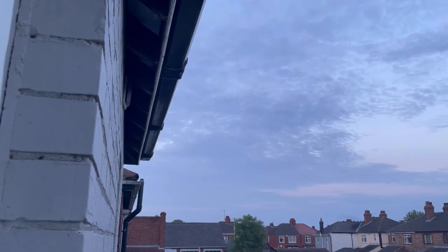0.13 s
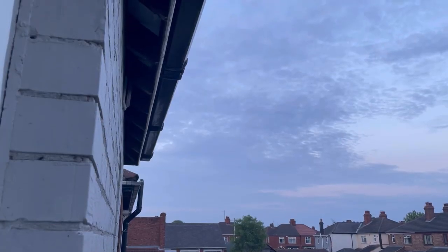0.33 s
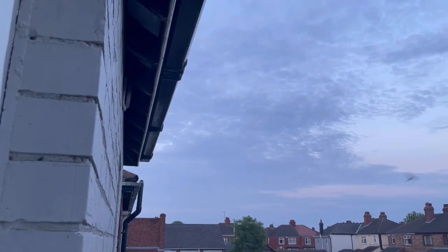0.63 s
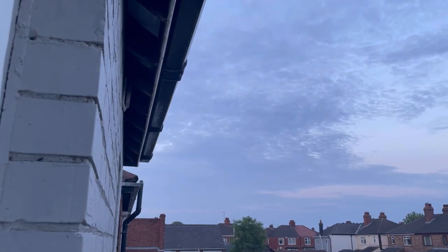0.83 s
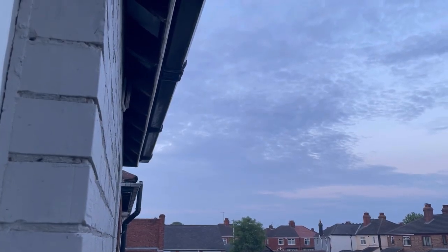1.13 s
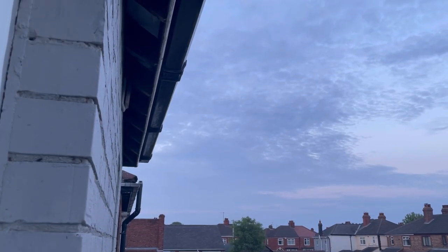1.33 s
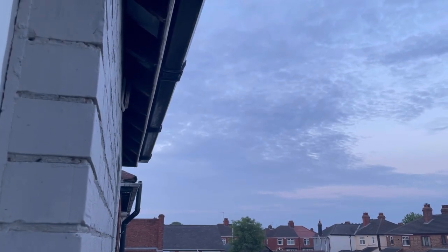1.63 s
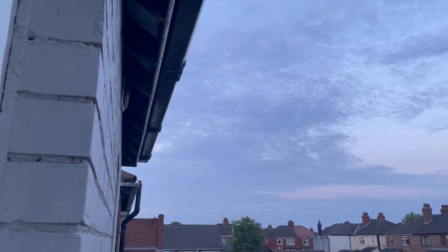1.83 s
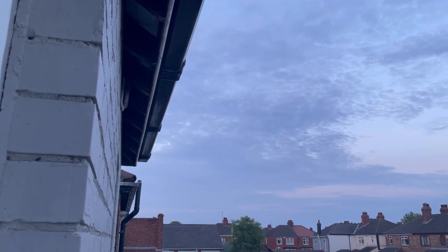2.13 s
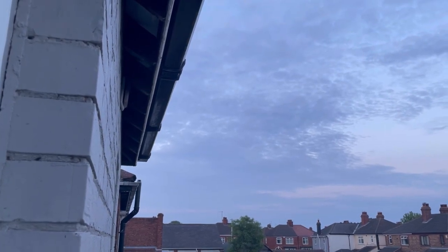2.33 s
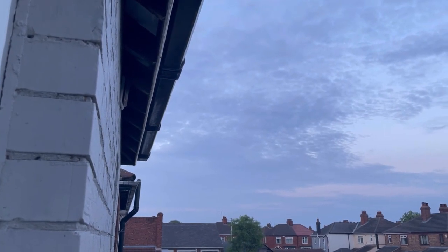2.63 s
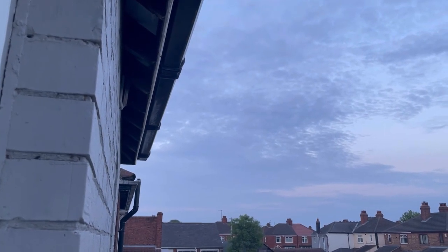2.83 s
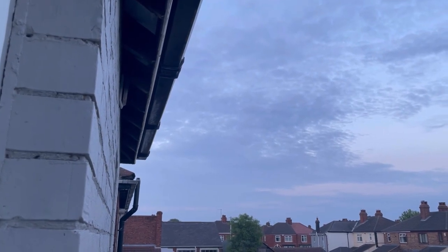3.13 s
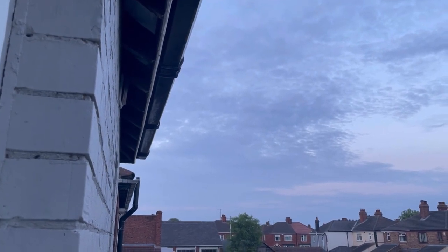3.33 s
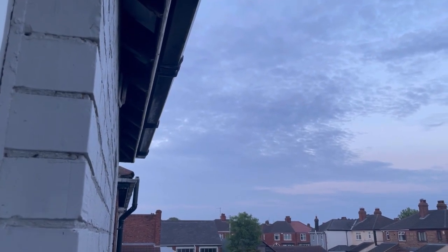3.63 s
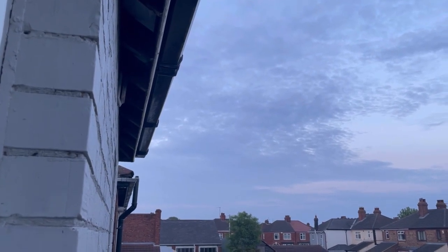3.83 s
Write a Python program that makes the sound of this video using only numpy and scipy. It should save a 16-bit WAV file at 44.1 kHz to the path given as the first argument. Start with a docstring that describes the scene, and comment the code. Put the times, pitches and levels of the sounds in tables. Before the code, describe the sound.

A swift screams twice in shrill trills as it shoots past, over faint traffic rumble.

```python
"""A swift screams twice as it shoots past the eaves of a house. Each scream is a fast shrill trill
that breaks into separate chips, falling in pitch; the wall and the far houses throw it back, and air
swishes over the wings. Behind it: traffic rumble with faint engine drones, light wind on the
microphone, the fading tail of an earlier swift scream, then faint chirps and distant songbirds."""
import sys
import numpy as np
from scipy import signal
from scipy.fft import rfft, irfft
from scipy.io import wavfile

SR = 44100
rng = np.random.default_rng(int(sys.argv[2]) if len(sys.argv) > 2 else 0)


def dump(signal):
    """Clip the signal to [-1, 1] and save it as 16-bit WAV at the path in sys.argv[1]."""
    limited = np.clip(np.atleast_2d(signal).T, -1, 1)
    pcm = np.round(limited * 32767).astype(np.int16)
    wavfile.write(sys.argv[1], SR, pcm)


N = 176400
T = np.arange(N) / SR
HZ = np.fft.rfftfreq(N, 1 / SR)
SIDES = np.array([[.5], [-.5]])  # splits a left-minus-right value between the ears


def amp(db):
    """Decibels to gain."""
    return 10 ** (np.asarray(db) / 20)


def unit_rms(x):
    """Scales to rms 1."""
    return x / np.sqrt(np.mean(x ** 2) + 1e-20)


def per_bin(points):
    """Interpolates (f/Hz, value) rows onto the FFT bins, in log frequency."""
    f, value = np.transpose(points)
    return np.interp(np.log(HZ + 1), np.log(f + 1), value)


def add(mix, start_s, sound):
    """Mixes a stereo sound in at start_s."""
    part = mix[:, max(round(start_s * SR), 0):][:, :sound.shape[1]]
    part += sound[:, :part.shape[1]]


def wander(size, hz):
    """Random signal of rms about 1, low-passed at hz."""
    return unit_rms(irfft(rfft(rng.standard_normal(N)) / (1 + (HZ / hz) ** 4), N))[:size]


def noise(spectrum, coherence):
    """Stereo noise of rms 1 with a given spectral shape and left-right coherence."""
    left, other = rfft(rng.standard_normal((2, N)))
    right = coherence * left + np.sqrt(1 - coherence ** 2) * other
    return unit_rms(irfft(np.array([left, right]) * amp(per_bin(spectrum)), N))


def gate(t, edge_s):
    """Sine-squared attack and release."""
    return np.sin(np.pi / 2 * np.clip(np.minimum(t, t[-1] - t) / edge_s, 0, 1)) ** 2


def diffuse(x, envelope):
    """Dense reflections: convolves x with an enveloped noise tail of about unit energy."""
    tail = rng.standard_normal((2, len(envelope))) * envelope / np.linalg.norm(envelope)
    return signal.fftconvolve(x, tail, axes=1)[:, :N]


def traffic():
    """Continuous rumble of far traffic."""
    # spectrum before the low cut: f/Hz, relative density/dB
    spectrum = [(15, -33), (25, -6.5), (59, -3.5), (120, -4.5), (145, -10.5), (229, -13), (373, -18.5),
                (476, -18.5), (560, -22), (988, -21), (1330, -30.5), (2410, -43.5), (3160, -51.5),
                (6920, -56), (8590, -63.5), (10100, -55), (16000, -76)]
    # likeness of the ears: f/Hz, coherence
    coherence = [(30, .85), (120, 0.91), (250, 0.742), (500, 0.42), (900, -0.31), (2000, 0.082),
                 (8000, 0.64)]
    # stereo balance: f/Hz, left-right/dB
    balance = [(30, -1), (70, 1), (150, 2.5), (300, 2), (550, 1.3), (8000, -1)]
    # loudness contour: t/s, level before trim/dB
    contour = [(0.0, -66), (0.37, -62), (3.54, -61.5), (3.7, -60.5), (3.84, -62), (4.0, -58.5)]
    low_cut_hz, trim_db = 90, 2.5
    bins = rfft(noise(spectrum, per_bin(coherence))) * amp(SIDES * per_bin(balance))
    rumble = unit_rms(irfft(bins * HZ ** 4 / (HZ ** 4 + low_cut_hz ** 4), N))
    level_db = np.interp(T, *np.transpose(contour)) + trim_db + .6 * wander(N, hz=14)
    return rumble * amp(level_db)


def engine_drones():
    """Wavering notes of far engines, a little to the left."""
    # engine swells: peak t/s, half length/s, f/Hz, level/dB
    swells = [(.3, 4, 120.8, -68), (3.497, 1.2, 232, -70), (3.701, 0.096, 367.8, -64.5)]
    width_hz, pan_db = 7, 3.5
    out = np.zeros(N)
    for peak_s, half_s, hz, db in swells:
        blur = wander(N, width_hz) + 1j * wander(N, width_hz)
        tone = (blur * np.exp(2j * np.pi * hz * T)).real
        out += amp(db) * np.exp(-((T - peak_s) / half_s) ** 2) * tone
    return out * amp(SIDES * pan_db)


def wind():
    """A light breeze with short puffs that thud on the microphone."""
    # puffs: peak t/s, half length/s, level/dB
    puffs = [(0.828, 0.044, -49), (1.595, 0.026, -46.5), (2.36, .015, -47.5), (2.46, 0.047, -49),
             (2.647, 0.019, -48.5), (2.751, 0.094, -59), (3.18, 0.064, -55), (3.699, .02, -43.5),
             (3.858, 0.038, -47.5), (3.978, 0.045, -50)]
    # buffeting spectrum: f/Hz, relative density/dB
    spectrum = [(15, -17.5), (35, -9), (60, 1), (110, -10), (200, -20.5), (500, -40), (2000, -70.5),
                (8000, -94.5)]
    breeze_db, build_s = -62.5, .6
    breeze = amp(breeze_db + 1.8 * wander(N, hz=5.3)) * np.clip(T / build_s, .15, 1)
    thuds = sum(amp(db) * np.exp(-((T - peak_s) / half_s) ** 2) for peak_s, half_s, db in puffs)
    return noise(spectrum, coherence=.86) * np.hypot(breeze, thuds)


def far_birds():
    """Blurred glides: the fading tail of an earlier swift scream, faint chirps, distant songbirds."""
    # far bird notes: t/s, length/s, level/dB, start f/Hz, end f/Hz
    notes = [(-.03, 0.11, -62.5, 5000, 5230), (0, 0.032, -63.5, 6940, 5900), (.027, .014, -60, 4100, 3600),
             (.092, 0.015, -55.5, 4000, 3600), (1.297, .035, -80.5, 2900, 2790),
             (1.43, 0.2, -81, 2638, 2313), (1.66, .12, -77, 2386, 2440), (1.89, 0.12, -80.5, 2137, 1930),
             (2.27, .13, -78.5, 1950, 2057)]
    width_hz = 120
    out = np.zeros((2, N))
    blur = np.array([wander(N, width_hz) + 1j * wander(N, width_hz) for ear in out])
    for start_s, length_s, db, from_hz, to_hz in notes:
        progress = np.clip((T - start_s) / length_s, 0, 1)
        turns = np.cumsum(from_hz + (to_hz - from_hz) * progress) / SR
        out += amp(db) * np.sin(np.pi * progress) * (blur * np.exp(2j * np.pi * turns)).real
    return out


def syrinx(hz, gain, over_db, under_db, pan_db):
    """The swift's voice: a shrill tone with overtones, unsteady half-pitch partials and slight hiss."""
    size, slip_rad = len(hz), .8
    phase = 2 * np.pi * np.cumsum(hz) / SR
    tone = np.sin(phase) + amp(over_db) * (np.sin(2 * phase) + amp(-17.5) * np.sin(3 * phase))
    half = phase / 2 + slip_rad * wander(size, hz=170)
    # undertone series: 1/2, 3/2 and 5/2 of the pitch
    under = amp(-11.5) * np.sin(half) + np.sin(half + phase) + amp(-13.5) * np.sin(half + 2 * phase)
    hiss = amp(-44) * wander(size, hz=9000)
    voice = np.sqrt(2) * (tone + amp(under_db) * under) + hiss
    return gain * voice * amp(SIDES * pan_db)


def trill(curve):
    """Pitch and loudness swing together, roughly 170-275 times a second."""
    swing_hz, jitter_hz = 265, 40
    dip_db, shimmer_db, offset_turns = 12, 2.2, .12
    times, *columns = np.transpose(curve)
    t = np.arange(times[0], times[-1], 1 / SR)
    hz, db, over_db, under_db, pan_db, rate_hz, depth = (np.interp(t, times, c) for c in columns)
    size = len(t)
    cycle = 2 * np.pi * np.cumsum(rate_hz * (1 + .06 * wander(size, hz=92))) / SR
    pitch_hz = hz + swing_hz * depth * np.cos(cycle) + jitter_hz * wander(size, hz=400)
    swing_db = dip_db / 2 * depth * np.sin(cycle + 2 * np.pi * offset_turns)
    flutter = unit_rms(amp(swing_db + shimmer_db * wander(size, hz=140)))
    gain = amp(db) * flutter * gate(t - t[0], edge_s=.002)
    return times[0], syrinx(pitch_hz, gain, over_db, under_db, pan_db)


def chip(length_s, db, hz, over_db, under_db, pan_db, rasp):
    """One short note of arched pitch; the forced ones rasp."""
    arch_hz, rasp_hz, rasp_db = 110, 400, 1.5
    t = np.arange(0, length_s, 1 / SR)
    pitch_hz = hz + arch_hz * (np.sin(np.pi * t / length_s) - 1)
    pitch_hz += rasp * rasp_hz * wander(len(t), hz=800)
    roughness = unit_rms(amp(rasp * rasp_db * wander(len(t), hz=755)))
    gain = amp(db) * gate(t, edge_s=.0026) * roughness
    return syrinx(pitch_hz, gain, over_db, under_db, pan_db)


def swift():
    """Two screams, each a trill that breaks into chips."""
    # one curve per trill: t/s, f/Hz, source level/dB, overtone/dB, undertone/dB, left-right/dB,
    # trill rate/Hz, trill depth/0-1
    trills = [
        [(.045, 5070, -48, -8, -40.5, 7.5, 171, 0.15), (.059, 5396, -32, -14, -43.5, 6.5, 194, .35),
         (.099, 5506, -32.5, -17, -51, 5.5, 226, .6), (.125, 5597, -30.5, -12.5, -49.5, 2, 253, .8),
         (.167, 5578, -29.5, -14.5, -49.5, -3, 257.6, .85), (.205, 5504, -28.5, -11.5, -50, 3, 234, 0.8),
         (.223, 5540, -32.5, -12, -37.5, 8.5, 275, 1), (.229, 5350, -46, -13, -35.5, 6, 268, .8)],
        [(.461, 4740, -58.5, -5, -29, 18, 185.2, 0), (.478, 5830, -48.5, -21.5, -30, 9, 199, 0.2),
         (.497, 5285, -44, -19.5, -15.5, -2.5, 191.4, 0.06), (.515, 5280, -45, -19, -10, -1.5, 171.5, 0.7),
         (.535, 5450, -38, -17.5, -35, 6, 187.8, 0.27), (.572, 5497, -37.5, -22, -26, -5.5, 231.8, 0.55),
         (.597, 5363, -39, -15.5, -15, -1, 241, 0.2), (.652, 5390, -41, -24.5, -27.5, 3.5, 233.4, 0.9),
         (.671, 5320, -50.5, -16, -12, -9.5, 181, 1)],
    ]
    # closing chips: t/s, length/s, source level/dB, f/Hz, overtone/dB, undertone/dB,
    # left-right/dB, rasp/0-1
    chips = [(0.2392, .0085, -28.5, 5700, -6, -25.5, -7, 1),
             (0.2647, .008, -19.5, 5893, -7.5, -33.5, 0.5, .2),
             (.272, .005, -28.5, 6750, -31, -23, -0.5, 1), (0.292, 0.0066, -22.5, 5916, -9, -33.5, -3, .4),
             (0.3182, 0.011, -28.5, 5376, -12.5, -28, -9.5, .2),
             (0.346, 0.013, -32, 4484, -24.5, -32.5, -4.5, 0.3),
             (.365, 0.012, -39.5, 4213, -30.5, -27.5, 4.5, 0.1),
             (0.6745, 0.011, -40, 5140, -21, -20.5, 9, 0.42),
             (0.688, 0.011, -36.5, 5350, -17.5, -32, 9.5, 0.15),
             (0.7023, 0.0061, -29.5, 5255, -17.5, -21, -8, 0.13),
             (.714, 0.0072, -38, 5294, -19, -24.5, 25, 0), (0.7263, .008, -34, 5120, -17, -37, 14.5, 0),
             (0.7385, 0.011, -31, 5020, -23, -27.5, -6, 0.2),
             (.7524, 0.0086, -37, 4840, -21, -30.5, 23, 0.07),
             (0.7665, .0075, -33.5, 4710, -26, -26.5, -11.5, 0.3),
             (.7792, .008, -38.5, 4586, -25.5, -24, 9, 0.6),
             (0.793, 0.017, -50.5, 4290, -36, -17, -2, 0.22)]
    out = np.zeros((2, N))
    for curve in trills:
        add(out, *trill(curve))
    for start_s, *note in chips:
        add(out, start_s, chip(*note))
    return out


def mic_ports(x):
    """Colour and phase that the two microphone ports give a close sound."""
    # port response: f/Hz, gain/dB
    colour = [(2700, 1), (3300, -3.5), (4500, -4.5), (6500, 1.5), (8000, -5), (9500, -3.5), (11500, 0),
              (12300, -7.5), (13000, -14), (14300, -8.5), (15700, -1.5)]
    # phase lead of the left ear: f/Hz, lead/rad
    lead = [(1000, .3), (4200, .8), (5600, 1.7), (8000, 1), (10600, .3), (11500, 1.5), (12300, 2.5),
            (16000, 1.8)]
    return irfft(rfft(x) * amp(per_bin(colour)) * np.exp(1j * SIDES * per_bin(lead)), N)


def wall_echoes(x):
    """Quick reflections from wall and eaves, different at each ear."""
    count, level_db = 8, -10
    delays_s = np.linspace(.001, .016, count) * rng.uniform(.8, 1.4, (2, count))
    gains = unit_rms(1 / np.sqrt(np.arange(count) + 1)) / np.sqrt(count)
    out = np.zeros((2, N))
    for ear in range(2):
        for delay_s, gain in zip(delays_s[ear], gains):
            out[ear] += gain * np.roll(x[ear], round(delay_s * SR))
    return amp(level_db) * out


def yard_scatter(x):
    """Short bright scatter from the nearby roof and ground."""
    level_db, t60_s, rise_s = -19.5, .2, .004
    t = T[:SR // 2]
    envelope = amp(-60 * t / t60_s) * (1 - np.exp(-t / rise_s))
    return amp(level_db) * diffuse(x, envelope)


def street_reverb(x):
    """A dull diffuse tail with a soft echo from the houses opposite."""
    send_db, t60_s, rise_s, cutoff_hz = -9.5, .62, .0089, 4000
    echo_db, echo_s, spread_s = -12, .21, .0084
    t = T[:SR]
    decay = amp(-60 * t / t60_s) * (1 - np.exp(-t / rise_s))
    houses = amp(echo_db) * np.exp(-((t - echo_s) / spread_s) ** 2)
    wet = amp(send_db) * diffuse(x, decay + houses)
    return irfft(rfft(wet) / (1 + (HZ / cutoff_hz) ** 4), N)


def wings():
    """Air rushing over the wings: faint on the approach, a quick swell at the closest point."""
    # swish spectrum: f/Hz, relative density/dB
    spectrum = [(300, -24), (900, -12), (1300, -9), (1700, -1.5), (2300, -13), (3200, -19), (4300, -7.5),
                (6500, -32), (12000, -47.5)]
    approach_db, approach_s, half_s = -68.5, .2534, .31
    swell_db, closest_s, rise_s, fall_s = -53, .397, .03, .031
    approach = amp(approach_db) * np.exp(-((T - approach_s) / half_s) ** 2)
    swell = amp(swell_db) * np.exp(-abs(T - closest_s) / np.where(T < closest_s, rise_s, fall_s))
    return noise(spectrum, coherence=.45) * np.hypot(approach, swell)


def scene():
    """The swift and its echoes over the town background."""
    screams = mic_ports(swift())
    echoes = wall_echoes(screams) + yard_scatter(screams) + street_reverb(screams)
    return screams + echoes + wings() + far_birds() + traffic() + engine_drones() + wind()


def record(dry):
    """The recorder's band limit."""
    cutoff_hz = 15900
    low_pass = signal.firwin(511, cutoff_hz, window=("kaiser", 9), fs=SR)
    return signal.oaconvolve(dry, low_pass[None], "same")


dry = scene()
out = record(dry)
dump(out)
```